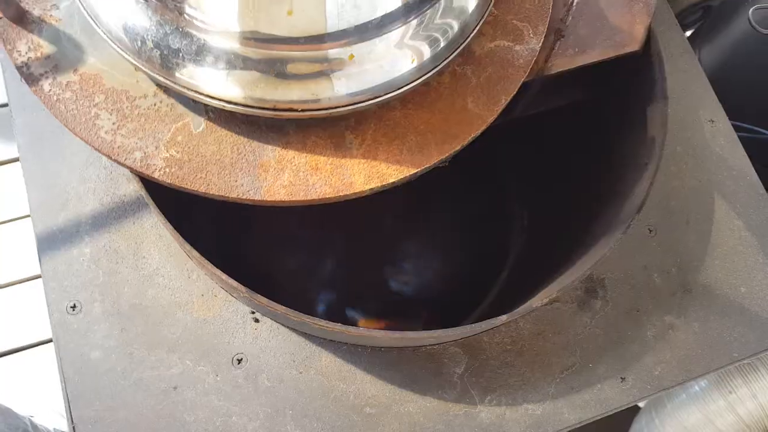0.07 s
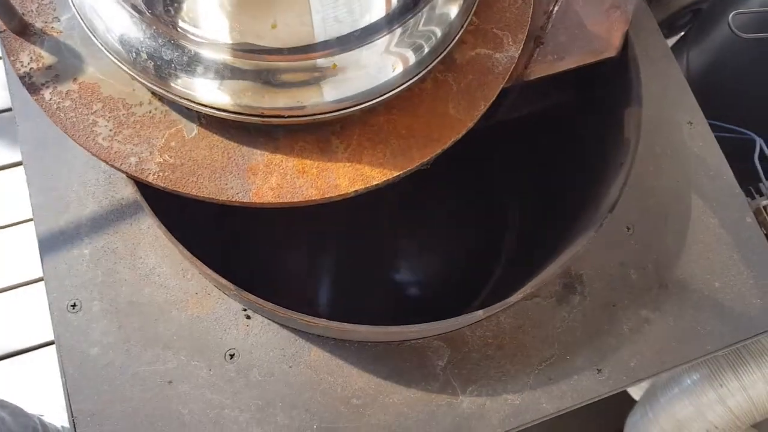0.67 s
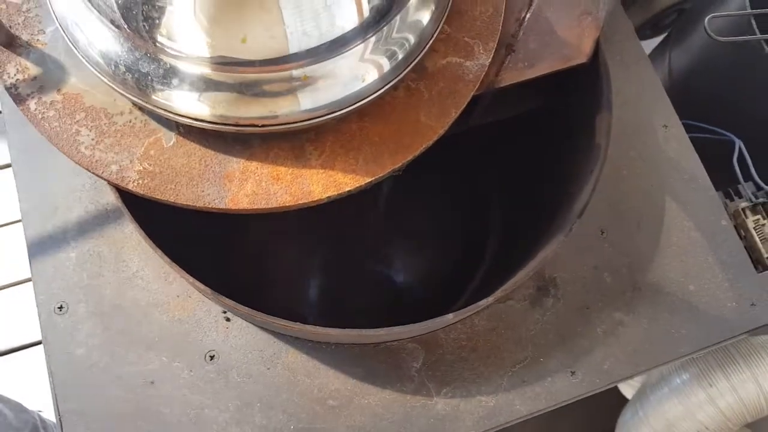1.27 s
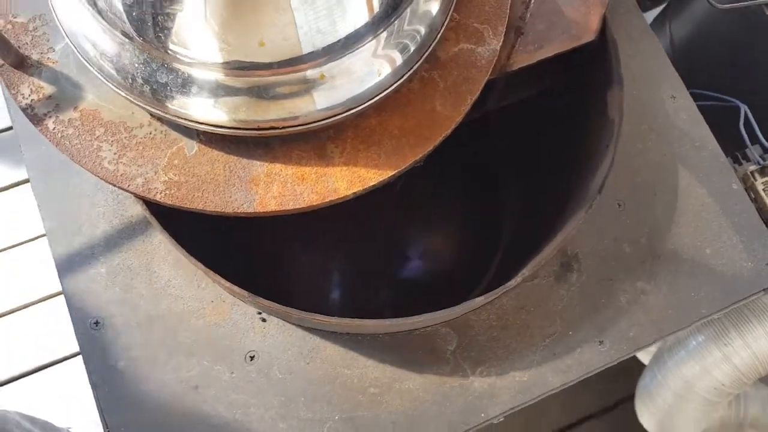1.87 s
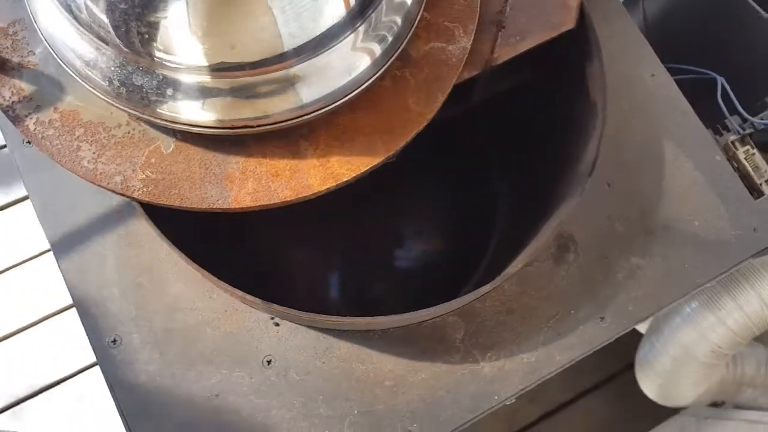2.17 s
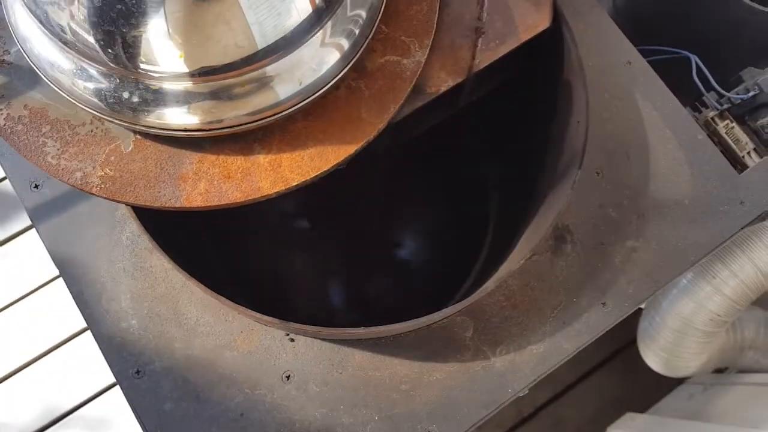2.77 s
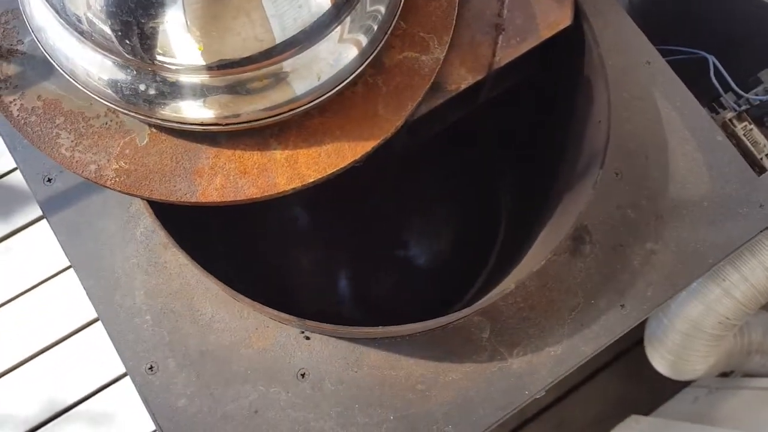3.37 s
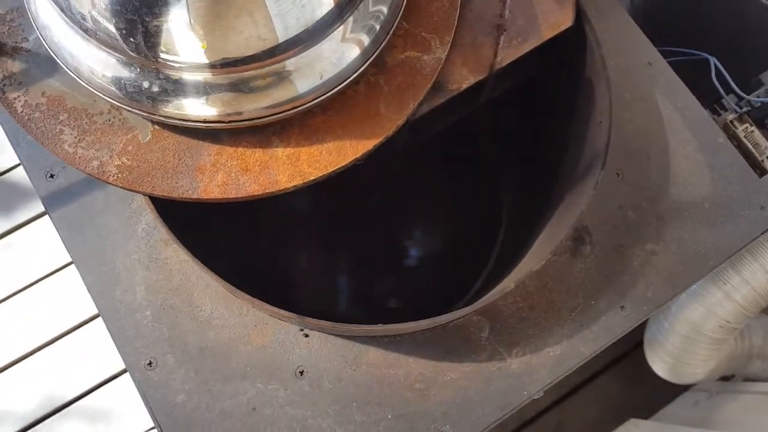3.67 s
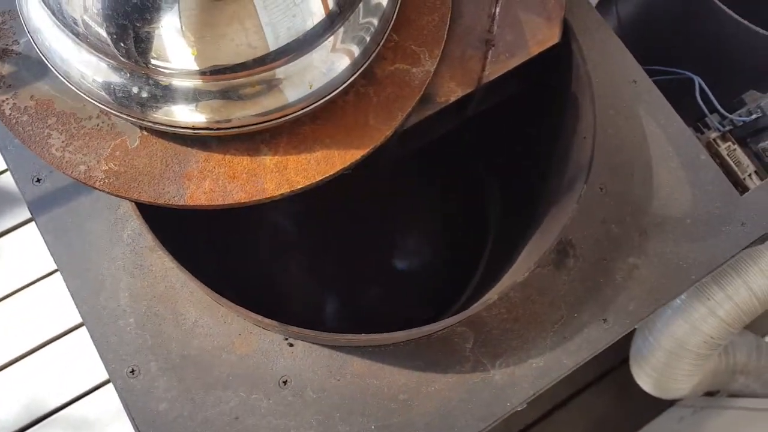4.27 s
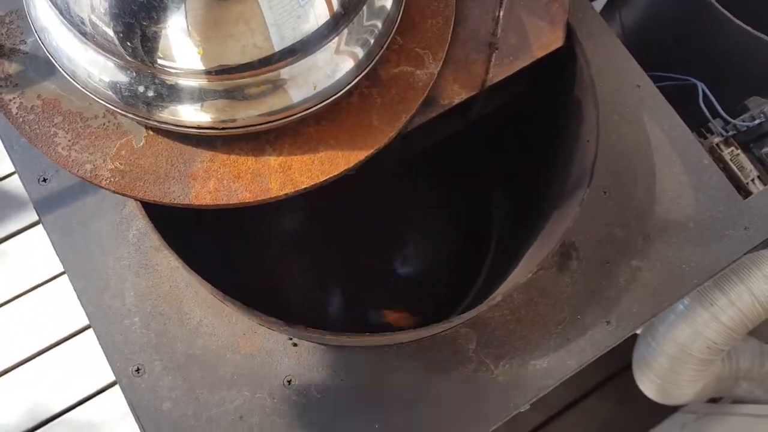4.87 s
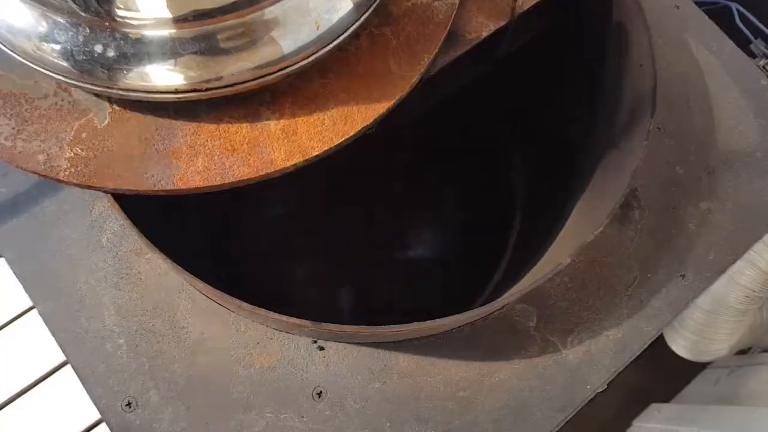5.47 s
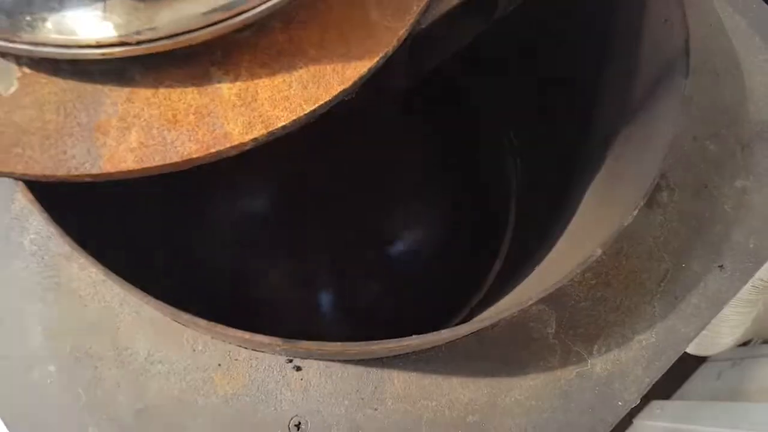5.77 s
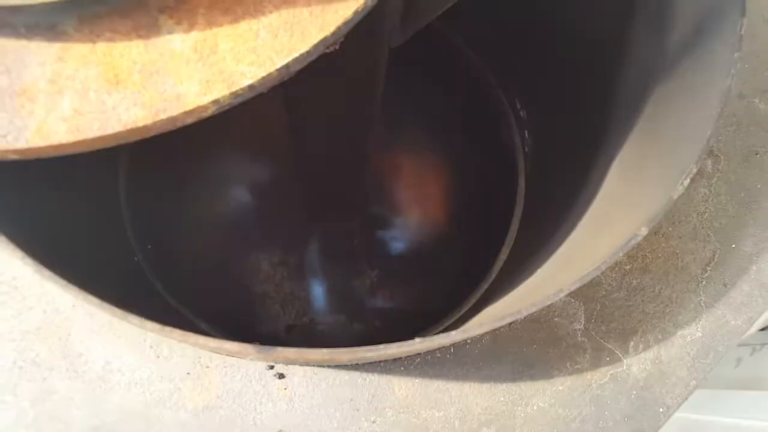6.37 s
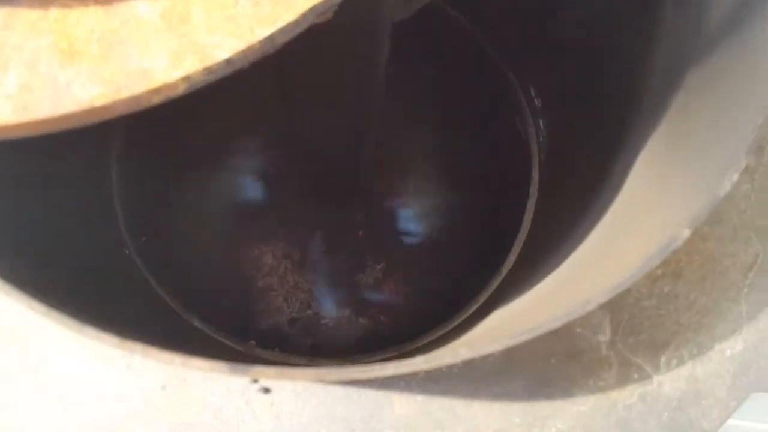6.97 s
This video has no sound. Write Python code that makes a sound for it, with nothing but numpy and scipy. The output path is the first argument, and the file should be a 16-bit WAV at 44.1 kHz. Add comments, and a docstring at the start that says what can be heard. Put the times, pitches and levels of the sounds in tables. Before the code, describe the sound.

An oil burner roars outdoors with a steady low boom and fluttering flame, with a few faint metal clicks.

```python
"""Outdoors, an oil burner roars in an open steel pot under its flue.
The turbulent flame keeps a low flue note booming and excites the pot's air modes; combustion air hisses
and swells with each flare. Now and then a thin sizzle rises; metal clicks and rattles briefly.
Near the end the microphone leans in over the opening."""
import sys
import numpy as np
from scipy import signal
from scipy.fft import rfft, irfft
from scipy.io import wavfile
from scipy.ndimage import uniform_filter1d

SR = 44100
rng = np.random.default_rng(int(sys.argv[2]) if len(sys.argv) > 2 else 0)


def log_audio(samples):
    """Write samples as a 16-bit WAV file to the path given in sys.argv[1]."""
    # one column per channel
    frames = np.atleast_2d(samples).T
    # limit to full scale, then quantise
    limited = np.clip(frames, -1, 1)
    pcm = np.round(limited * 32767).astype(np.int16)
    wavfile.write(sys.argv[1], SR, pcm)


N = 318402
CUTOFF_HZ = 15500
CONTACT_CYCLES = 0.26  # rise time constant of struck metal

# Flue note, creeping up as the draught builds: (time [s], pitch [Hz])
FLUE_PITCH = [(0, 131), (.75, 131), (1.1, 126), (2.05, 125), (2.4, 133), (2.8, 135), (3.1, 144),
              (3.45, 134), (3.85, 140), (4.35, 134), (7.22, 136)]
# Turbulence around the note: (frequency [Hz], density [dB])
RUMBLE_SPECTRUM = [(15, -32.5), (32, -24.5), (50, -30.5), (70, -3), (88, 0.5), (112, 9.5), (140, 8),
                   (168, 1.5), (198, 6.5), (215, -2.5), (232, 0.5), (260, -9), (340, -22.5), (500, -65.5)]
# Slow rise and fall of the low rumble: (time [s], gain below the flue note [dB], gain above it [dB])
RUMBLE_GAINS = [(0, -2.5, -2), (.9, 2, -1), (1.7, 1.5, -1), (2.6, -2.5, 1), (3.3, 0.5, 0.8), (4.0, 3, 3),
                (4.7, 0, -1), (5.4, 0.5, 1.5), (6.2, 2, -2), (7.22, -3, -4)]
# Stalls and surges of the boom: (time [s], length [s], gain [dB])
THROBS = [(.88, 0.08, -3), (2.0, 0.022, -10.5), (2.23, 0.028, -1), (2.55, 0.027, -3), (2.81, .025, -6),
          (2.915, 0.019, -5.5), (2.95, 0.012, 2.5), (3.14, 0.13, -2), (3.3, .08, 1), (3.47, 0.025, 5),
          (3.59, 0.04, -5), (3.99, 0.026, 2), (4.14, 0.016, -2.5), (4.23, 0.024, -5), (5.37, 0.039, -4.5),
          (5.44, 0.086, 2), (5.63, 0.036, -4.5), (5.8, 0.017, -19.5), (6.1, 0.042, -4.5), (6.15, 0.041, 4),
          (6.61, 0.026, 0), (7.06, 0.095, 3.5), (7.13, 0.047, -6.5)]
def flue_boom(half_width_hz, wander_hz, rumble_db, saturation, side_db):
    """Heat release pumps the flue's lowest mode; the swing saturates."""
    pitch_hz, = in_time(FLUE_PITCH)
    below_db, above_db = in_time(RUMBLE_GAINS)
    throb_db, = swells(THROBS)
    phase = 2 * np.pi * np.cumsum(pitch_hz + wander_hz * drift(6.53)) / SR
    note = unit_rms(drift(half_width_hz) * np.cos(phase) + drift(half_width_hz) * np.sin(phase))
    colour = from_db(across_hz(RUMBLE_SPECTRUM))
    rumble = stereo_noise(colour, correlation=1)
    below = irfft(rfft(rumble) * (bins_hz() < pitch_hz.mean()), N)
    rumble = from_db(below_db) * below + from_db(above_db) * (rumble - below)
    swing = steadied(note + from_db(rumble_db) * rumble, span_s=0.12)
    swing = unit_rms(swing / (1 + envelope(swing, span_s=0.023) ** 2) ** saturation)
    side = from_db(side_db) * stereo_noise(colour, correlation=-1)
    return from_db(throb_db) * (swing + side)


def pot_howl(hz, width_hz):
    """Turbulence drives the pot's strongest air mode."""
    return steadied(stereo_noise(resonance(hz, width_hz), correlation=1), span_s=0.06)


# Crosswise air modes: (frequency [Hz], width [Hz], level [dB], L/R correlation, gain when near [dB])
CROSS_MODES = [(1068, 44, -3, 1, -4.5), (1119, 30, -6, 0.88, 2), (1201, 60, -1.5, 0.93, 3),
               (1237.4, 44, 0.5, .8, 5), (1275, 46, -1.5, 0.32, -2.5)]
def pot_ring(near):
    """The pot's crosswise air modes ring hollow."""
    return steadied(air_modes(CROSS_MODES, near), span_s=0.066)


# Body of the roar: (frequency [Hz], density [dB])
BODY_SPECTRUM = [(150, -11), (290, 0), (360, -4), (440, -1.5), (520, 1.5), (720, -7), (850, -14),
                 (980, -22), (1400, -44.5), (2500, -60.5)]
def roar_body():
    """Dull low-mid noise of the flame."""
    return stereo_noise(from_db(across_hz(BODY_SPECTRUM)), across_hz(CORRELATION))


# Flame rush: (frequency [Hz], density [dB])
RUSH_SPECTRUM = [(700, -1), (1000, 3.5), (1400, 2.5), (1700, 4), (1850, 0), (2450, 1.5), (2700, -3),
                 (3300, -7), (3800, -5.5), (5500, -14.5), (12000, -33)]
# Higher air modes: (frequency [Hz], width [Hz], level re rush [dB], L/R correlation, gain when near [dB])
HIGH_MODES = [(1558, 37, -9.5, 0.23, -0.5), (1648, 37, -13.5, .3, -2), (1790, 50, -15.5, .3, 4),
              (1980, 67, -12.5, 0.48, 6), (2126, 58, -9, 0.53, 4.5), (2280, 32, -21, .3, 6.5),
              (2360, 62, -12, 0.35, -3.5), (2505, 62, -14.5, .5, -1), (2857, 105, -15, 0.43, 4),
              (2990, 28, -17, .3, -1.5), (3047, 42, -16.5, 0.19, -3.5), (3200, 70, -22, .3, 0),
              (3310, 45, -22.5, 0.35, 3), (3545, 60, -18.5, 0.29, 2.5), (3740, 110, -26, .3, 3.5)]
def flame_rush(near):
    """Broad combustion noise, coloured by the pot's higher modes."""
    rush = stereo_noise(from_db(across_hz(RUSH_SPECTRUM)), across_hz(CORRELATION))
    return unit_rms(rush + air_modes(HIGH_MODES, near))


# Intake air: (frequency [Hz], density [dB])
HISS_SPECTRUM = [(2000, -10.5), (4000, 0), (5200, -0.5), (7000, -1.5), (9500, -1), (11000, -5),
                 (13000, -8.7), (14800, -16.5), (16000, -31)]
def air_hiss(spits_per_s, spit_db):
    """Air rushes into the flame; oil droplets spit faintly in it."""
    colour = from_db(across_hz(HISS_SPECTRUM))
    spits = unit_rms(irfft(rfft(impulses(spits_per_s)) * colour, N))
    return stereo_noise(colour, across_hz(CORRELATION)) + from_db(spit_db) * spits


# Metal ticks: (time [s], peak [dB], centre [Hz], spread [oct], L-R [dB])
CLICKS = [(.022, -22, 9050, 0.84, -2), (0.026, -29, 6000, 0.91, 1), (0.0295, -38, 6000, 1.3, -.5),
          (.037, -30, 5500, 1.3, -4), (0.047, -36, 5500, 1.3, 5), (.063, -24, 10000, 1.1, 5),
          (0.0713, -14, 7000, 1.2, 0), (.086, -28, 6500, 1.4, 2), (0.0943, -16, 6200, 1, 2),
          (0.113, -30, 8000, 1.4, 2), (.372, -36, 8050, 1.3, -1), (1.3882, -24, 5560, 0.34, 4),
          (1.388, -22.5, 2500, .5, 2), (1.3955, -34, 3200, .8, 2), (1.681, -28, 4400, 0.59, 0),
          (2.8605, -40, 8000, 1, 0), (3.5244, -18, 5200, 0.79, 0), (3.547, -26, 5000, 1.2, -2),
          (3.5508, -23, 8500, 1.6, 5), (3.598, -32, 5500, 0.88, -3), (4.238, -32, 4200, .7, 4),
          (6.731, -30, 3000, .9, 0), (6.736, -29, 3000, 1.1, 0)]
# Modes of the ticking metal: (frequency [Hz], level [dB], T60 [s])
CLICK_MODES = [(1950, -15, 0.0066), (2450, -2.5, 0.018), (2850, -1.5, 0.014), (3520, -5, 0.0089),
               (4950, -6, 0.0068), (5630, -8, 0.0098), (6270, -7.5, 0.0063), (7460, -13, 0.0041),
               (8600, -4, 0.0049), (10600, -5.5, 0.0044), (13300, -13, .004)]
def metal_clicks(scatter_db, scatter_t60_s):
    """Each click rings the metal's modes around its own pitch and scatters off the casing."""
    out = np.zeros((2, N))
    t = np.arange(SR // 12) / SR
    hz, mode_db, t60_s = np.transpose(CLICK_MODES)[:, :, None]
    for time_s, peak_db, centre_hz, spread_oct, pan_db in CLICKS:
        weight = np.exp(-.5 * (np.log2(hz / centre_hz) / spread_oct) ** 2)
        strength = weight * from_db(mode_db + rng.normal(0, 1, (2, len(hz), 1)))
        phase = 2 * np.pi * (hz * t + rng.random((len(hz), 1))) + rng.standard_normal((2, len(hz), 1))
        attack = 1 - np.exp(-t * centre_hz / CONTACT_CYCLES)
        ring = attack * np.sum(strength * np.sin(phase) * from_db(-60 * t / t60_s), axis=1)
        low_hz, high_hz = centre_hz * np.exp2([-spread_oct, spread_oct])
        scatter = band_limited(rng.standard_normal((2, len(t))), low_hz, high_hz)
        scatter *= from_db(scatter_db - 60 * t / scatter_t60_s)
        add_panned(out, ring / np.abs(ring).max() + scatter, time_s, peak_db, pan_db)
    return out


# Knocks of a loose metal part: (time [s], peak [dB], L-R [dB], crack re peak [dB])
KNOCKS = [(3.5378, -26, -8, -10), (3.5468, -27, 0, -9), (3.558, -33, -2, -6), (3.565, -15, -5, -15),
          (3.5727, -23, 9, -12), (3.5777, -27, -8, -10)]
# Modes of the loose part: (frequency [Hz], level [dB], T60 [s])
RATTLE_MODES = [(1230, -8, 0.028), (1800, -6, 0.011), (2180, -8, 0.011), (2630, -1, 0.012),
                (3090, -1, 0.02), (3140, 0.5, 0.018), (4080, -7, .009), (4530, -13, 0.0083),
                (5300, -10.5, .017), (8800, -15, .007)]
def rattle(touches, gap_s, touch_loss_db, crack_t60_s):
    """Each knock is a broad crack and a few chattering touches that leave the part pinging."""
    out = np.zeros((2, N))
    t = np.arange(SR // 12) / SR
    hz, mode_db, t60_s = np.transpose(RATTLE_MODES)[:, :, None]
    for time_s, peak_db, pan_db, crack_db in KNOCKS:
        ring = 0
        for touch in range(touches):
            age_s = np.maximum(t - gap_s * touch * rng.uniform(0.72, 1.31), 0)
            phase = 2 * np.pi * (hz * age_s + rng.random((len(hz), 1)))
            phase = phase + .5 * rng.standard_normal((2, len(hz), 1))
            attack = 1 - np.exp(-age_s * hz / CONTACT_CYCLES)
            decay = from_db(mode_db - touch_loss_db * touch - 60 * age_s / t60_s)
            ring += np.sum(np.sin(phase) * attack * decay, axis=1)
        crack = rng.uniform(-1.1, 1, (2, len(t))) * from_db(crack_db - 60 * t / crack_t60_s)
        add_panned(out, ring / np.abs(ring).max() + crack, time_s, peak_db, pan_db)
    return out


# Runs of fine crackle: (time [s], length [s], level [dB])
CRACKLES = [(0.017, 0.055, -39.5), (0.097, 0.026, -50), (0.379, 0.023, -48.5), (2.867, .015, -48),
            (3.56, 0.071, -50)]
def crackles(snaps_per_s, low_hz, high_hz):
    """Short crowds of tiny bright snaps."""
    snaps = unit_rms(band_limited(impulses(snaps_per_s) + 1e-18, low_hz, high_hz))
    return snaps * swells([(time_s, length_s, from_db(db)) for time_s, length_s, db in CRACKLES])


# Thin sizzles: (time [s], length [s], level [dB], pitch [Hz])
SIZZLES = [(1.32, 0.25, -61, 12200), (3.422, 0.11, -57, 12500), (3.56, 0.13, -56, 12900),
           (5.86, 0.34, -60.5, 12300)]
def sizzles(width_hz, whistle_db, waver_hz, sputter_db):
    """Narrow hiss with wavering whistles, as from oil dropping onto the hot pan."""
    whistles = [(np.cumsum(waver_hz * drift(9)) / SR, from_db(sputter_db * drift(30))) for _ in range(4)]
    t = np.arange(N) / SR
    out = np.zeros((2, N))
    for time_s, length_s, level_db, hz in SIZZLES:
        tones = sum(gain * np.sin(2 * np.pi * (hz * t + slip_cycles)) for slip_cycles, gain in whistles)
        hiss = stereo_noise(resonance(hz, width_hz), correlation=0)
        sizzle = unit_rms(hiss + from_db(whistle_db) * unit_rms(tones))
        out += sizzle * swells([(time_s, length_s, from_db(level_db))])
    return out


def air_modes(modes, near):
    """Turbulence drives each mode; their mix shifts as the microphone nears the opening."""
    return sum(from_db(level_db + near_db * near) * stereo_noise(resonance(hz, width_hz), correlation)
               for hz, width_hz, level_db, correlation, near_db in modes)


# Channel likeness of body, rush and hiss: (frequency [Hz], L/R correlation)
CORRELATION = [(100, 1), (340, 0.94), (500, 1), (800, 0.94), (1050, 0.78), (1500, 0.94), (2000, 0.41),
               (3000, 0.37), (4200, -0.1), (5000, -.15), (7000, 0.029), (15000, -0.31)]
# Channel balance: (frequency [Hz], L-R [dB])
BALANCE = [(100, -0.5), (600, 0.46), (1130, -0.5), (1300, 6.5), (1650, -2.5), (2050, 4.5), (2500, -1.5),
           (4190, -3.5), (6410, -4), (9810, -1), (15000, 1)]
# Phase of the pot's air modes between the microphone ports: (frequency [Hz], left lead [rad])
PORT_LEAD = [(100, 0), (600, 0.19), (1000, 0.39), (1200, 1.34), (1450, 0.1), (1750, 1.8), (1900, 1.5),
             (2100, -3), (2500, 1), (3100, -0.5), (15000, 0.5)]
def stereo_noise(colour, correlation):
    """Coloured noise at the two microphone ports, unit rms."""
    mid, side = rfft(rng.standard_normal((2, N))) * colour
    correlation = np.clip(correlation, -.999, .999)
    pair = np.sqrt(1 + correlation) * mid + np.sqrt(1 - correlation) * side * [[1], [-1]]
    port = from_db(.5 * across_hz(BALANCE)) * np.exp(.5j * across_hz(PORT_LEAD))
    return unit_rms(irfft(pair * [port, 1 / port], N))


def impulses(per_s):
    """Stereo impulses of random time and size."""
    return rng.standard_normal((2, N)) * (rng.random(N) < per_s / SR)


def drift(rate_hz):
    """Low-passed random motion, unit rms."""
    return unit_rms(irfft(rfft(rng.standard_normal(N)) / (1 + (bins_hz() / rate_hz) ** 2), N))


def flicker(rate_hz):
    """Drift less its 0.1 s mean, unit rms."""
    wander = drift(rate_hz)
    return unit_rms(wander - uniform_filter1d(wander, size=SR // 10))


def swells(rows):
    """Summed smooth bumps from rows of (centre [s], length at half height [s], heights...)."""
    centre_s, length_s, *heights = np.transpose(rows)
    distance = (np.arange(N) / SR - centre_s[:, None]) / (length_s[:, None] / 2)
    return np.array(heights) @ np.exp2(-np.minimum(np.abs(distance) ** 2.8, 20))


def in_time(rows):
    """Table columns interpolated at every sample."""
    time_s, *columns = np.transpose(rows)
    return [np.interp(np.arange(N) / SR, time_s, column) for column in columns]


def across_hz(rows):
    """Table interpolated at every bin, in log frequency."""
    hz, value = np.transpose(rows)
    return np.interp(np.log(bins_hz()), np.log(hz), value)


def bins_hz():
    """FFT bin frequencies, floored at 1 Hz."""
    return np.maximum(np.arange(N // 2 + 1) * SR / N, 1)


def resonance(hz, width_hz):
    """Gain of a resonator passed twice, for steep skirts."""
    f = bins_hz()
    return 1 / (1 + (np.sqrt(2) - 1) * ((f * f - hz * hz) / (f * width_hz)) ** 2)


def band_limited(x, low_hz, high_hz):
    """Band-pass with edges capped at the cutoff."""
    edges_hz = np.minimum([low_hz, high_hz], CUTOFF_HZ)
    return signal.sosfilt(signal.butter(2, edges_hz, "band", fs=SR, output="sos"), x)


def envelope(x, span_s):
    """Running rms over both channels."""
    size = int(span_s * SR)
    power = np.mean(x ** 2, axis=0)
    return np.sqrt(uniform_filter1d(uniform_filter1d(power, size), size) + 1e-12)


def steadied(x, span_s):
    """Hold slow power at one; keep the fast beating."""
    return unit_rms(x / envelope(x, span_s))


def add_panned(out, hit, time_s, level_db, pan_db):
    """Mix a hit into out; positive pan is left."""
    start = int(time_s * SR)
    gains = from_db(level_db + pan_db * np.array([[.5], [-.5]]))
    out[:, start:start + hit.shape[1]] += gains * hit[:, :N - start]


def unit_rms(x):
    """Scale to unit power."""
    return x / np.sqrt(np.mean(np.abs(x) ** 2) + 1e-20)


def from_db(db):
    """Decibels to gain."""
    return 10 ** (np.asarray(db) / 20)


# Slow draught changes: (time [s], howl [dB], rush [dB], hiss [dB])
DRAUGHT = [(0, -1, 2, 1.5), (.35, 1.5, 2.5, 0), (.6, -4.5, 0, -2), (1.0, -3, -2, -2.5), (1.3, -1.9, -2, 0),
           (1.8, -1, 0, 0.5), (2.4, -5.5, 0, 0.5), (3.0, -1.5, 0, -0.5), (3.7, -3.5, -0.5, -0.5),
           (4.9, -0.5, 0.5, -1), (5.35, -6, -2, -3), (5.8, -2, 0.5, 1.5), (6.4, 0.5, 1.5, 3.5),
           (7.22, -3, 0, 0)]
# Flame flares and dips: (time [s], length [s], rush [dB], howl [dB], ring [dB])
FLARES = [(.02, 0.1, 4.5, -1, 1), (.09, 0.047, -5, 6, 5), (.22, 0.062, -1, 4.5, 1.5),
          (.74, 0.073, 2, 6.5, 4), (.88, 0.089, 5, 7.5, 9), (1.1, 0.16, 6, 5.5, 8.5),
          (1.43, 0.038, 2, 8, 0), (1.53, 0.11, 3.5, -0.5, 3.5), (1.7, 0.045, 4.5, 5.5, 6),
          (1.85, 0.058, 4, 4.5, 2.5), (2.04, 0.056, 0, -7, -8), (2.18, 0.13, 5.5, 7, 4),
          (2.54, 0.028, 2.5, 11, 0.5), (2.82, 0.15, 3.5, -0.5, 0), (2.99, 0.058, 5, 0, 3),
          (3.12, 0.05, 5, -2, -1.5), (3.21, 0.055, 3.5, -1.5, 7), (3.3, .04, -6, 0.5, 1.5),
          (3.41, 0.24, 4.5, 1, 0), (3.645, 0.15, 5.5, 1.5, 6), (3.805, 0.05, 6, 6.5, 7),
          (3.85, 0.043, 3.5, -1, -2), (4.02, 0.024, 8, 2.5, 10), (4.125, 0.037, 5.5, -3, 4),
          (4.24, 0.031, 9, 0.5, 6), (4.29, 0.061, 6.5, 3.5, 1), (4.455, 0.042, 6.5, 7, 2.5),
          (4.52, 0.035, 6, -3, 3), (4.557, 0.016, 4.5, 2, 6), (4.69, 0.069, 4.5, 1.5, 1),
          (4.79, 0.036, 1.5, 3.5, 4.5), (5.01, 0.043, 5.5, -4, 2.5), (5.09, 0.024, 5, 5.5, -0.5),
          (5.205, 0.029, 3, 7, -1), (5.385, 0.08, 2.5, 6.5, 3), (5.45, 0.029, -4.5, -2.5, -4),
          (5.64, 0.072, 2.5, 3, 8), (5.78, 0.036, 2, -2, -1), (5.93, 0.055, 2, 5, -4),
          (6.04, 0.022, 0.5, -6, 8.5), (6.215, 0.034, -6.5, -7.5, -1), (6.29, .06, 0, 0.5, 0.5),
          (6.358, 0.041, 4, -1.5, 3.5), (6.402, 0.03, -5, -4.5, -4.5), (6.425, 0.012, 2, 7.5, 7.5),
          (6.475, 0.033, 2.5, 4.5, -1.5), (6.545, 0.04, -5, -6.5, -3), (6.612, 0.019, 3.5, 6.5, 5),
          (6.83, 0.027, -4.5, -4.5, -1.5), (6.955, 0.024, 5, 7.5, 3)]
# Microphone over the opening: (time [s], nearness [0-1])
NEARNESS = [(0, 0.2), (.5, 0.3), (1.5, 0), (3, 0.05), (5.3, 0), (5.7, 0.81), (6.3, 1), (7.22, 0.94)]
def scene():
    """One flame's boom, howl, ring, body, rush and hiss, with small noises on top."""
    howl_draught_db, rush_draught_db, hiss_draught_db = in_time(DRAUGHT)
    rush_flare_db, howl_flare_db, ring_flare_db = swells(FLARES)
    near, = in_time(NEARNESS)
    sputter = flicker(20)  # small flares between the big ones
    flutter = flicker(54)  # flame flicker, common to the upper layers
    gust = drift(2.3)  # uneven draught
    flame_db = rush_draught_db + rush_flare_db + sputter + gust
    howl_db = -25 + howl_draught_db + howl_flare_db + flicker(22) + 0.74 * flutter
    ring_db = -38 + 1.4 * rush_draught_db + ring_flare_db + 4.55 * near + 0.24 * sputter + 1.7 * flutter
    hiss_db = -54.5 + hiss_draught_db + 0.35 * rush_flare_db
    hiss_db += 0.55 * sputter + flutter + 0.57 * gust + 0.99 * drift(8)

    boom = flue_boom(half_width_hz=12.7, wander_hz=2.383, rumble_db=-5, saturation=0.29, side_db=-33.5)
    mix = from_db(-11 + near) * boom
    mix += from_db(howl_db) * pot_howl(hz=622.4, width_hz=52)
    mix += from_db(ring_db) * pot_ring(near)
    mix += from_db(-31.5 + 5.5 * near + 0.65 * flame_db) * roar_body()  # beams out of the opening
    mix += from_db(-42.5 + flame_db + 0.92 * flutter + 0.37 * flicker(45)) * flame_rush(near)
    mix += from_db(hiss_db) * air_hiss(spits_per_s=150, spit_db=-11)
    mix += sizzles(width_hz=1900, whistle_db=-4, waver_hz=330, sputter_db=3.5)
    mix += crackles(snaps_per_s=3600, low_hz=2800, high_hz=9000)
    mix += metal_clicks(scatter_db=-17, scatter_t60_s=0.03)
    mix += rattle(touches=3, gap_s=0.00143, touch_loss_db=12, crack_t60_s=0.0087)
    return mix


def record(dry):
    """Microphone chain: bass cut, soft clip, end fades, steep low-pass."""
    thinned = signal.sosfilt(signal.butter(2, 42, "high", fs=SR, output="sos"), dry)
    rounded = thinned / (1 + np.abs(thinned / .95) ** 12) ** (1 / 12)
    faded = rounded * signal.windows.tukey(N, .001)
    return signal.sosfilt(signal.ellip(10, .1, 80, CUTOFF_HZ, fs=SR, output="sos"), faded)


dry = scene()
out = record(dry)
log_audio(out)
```